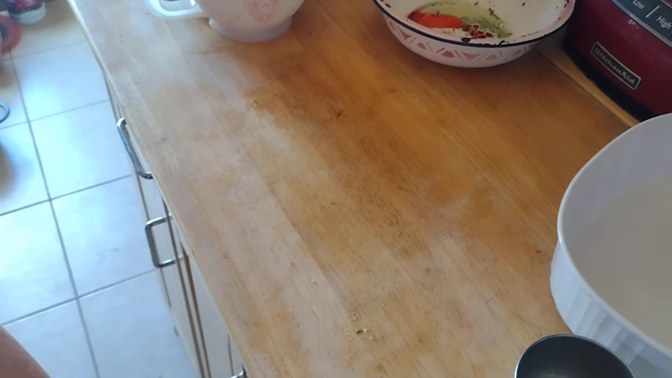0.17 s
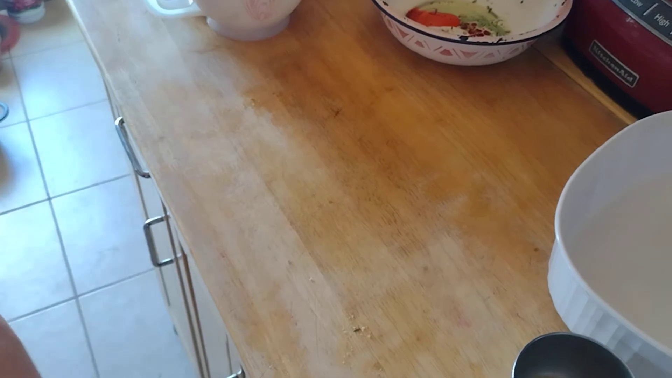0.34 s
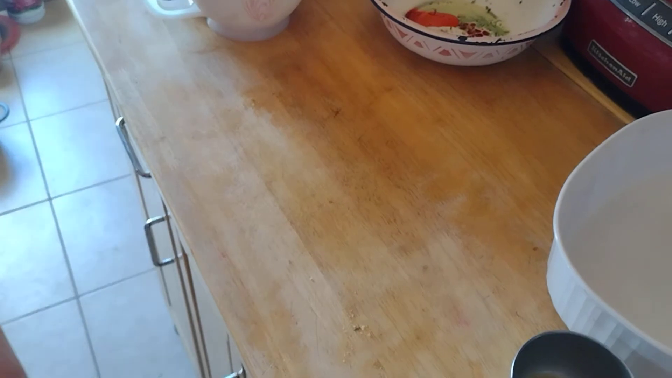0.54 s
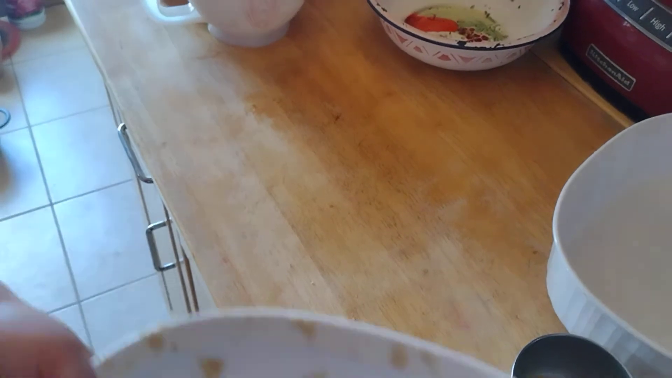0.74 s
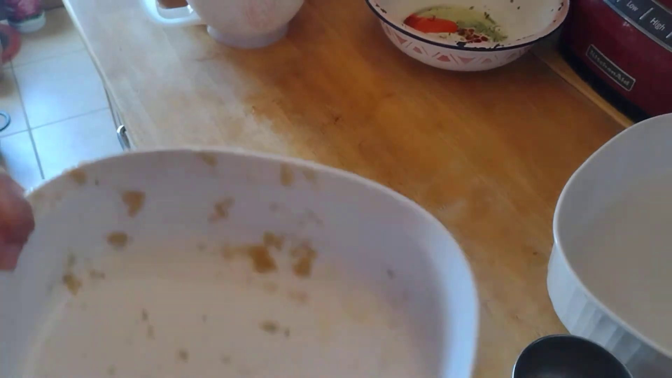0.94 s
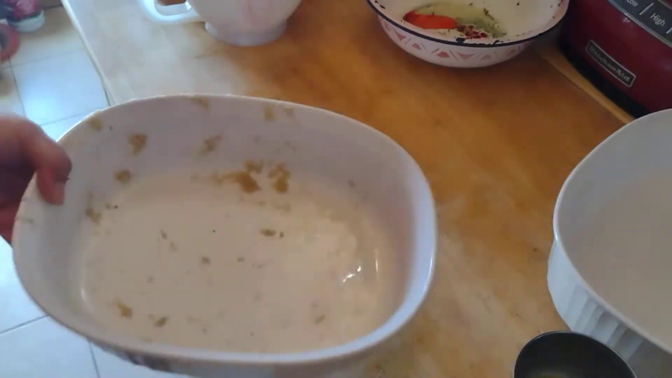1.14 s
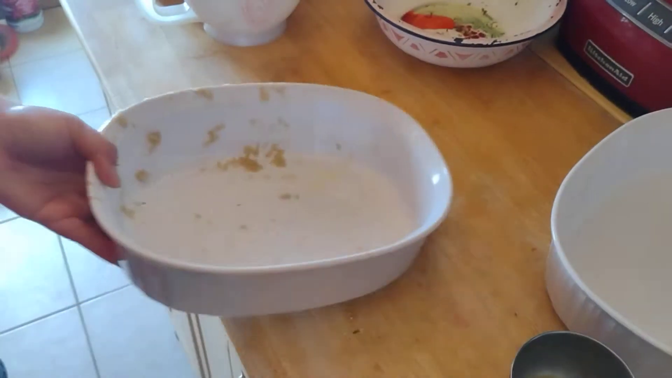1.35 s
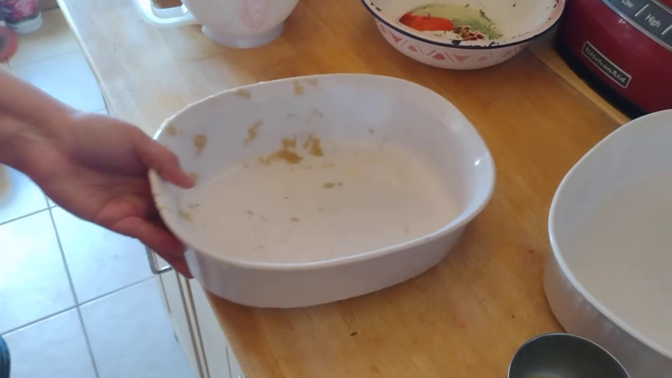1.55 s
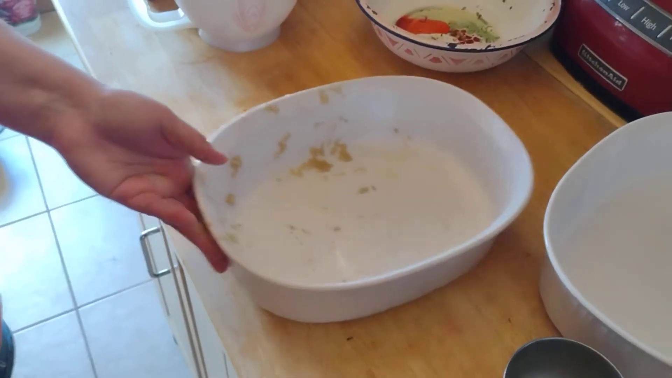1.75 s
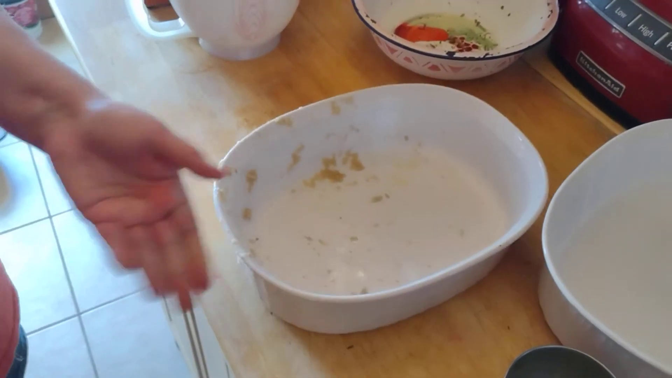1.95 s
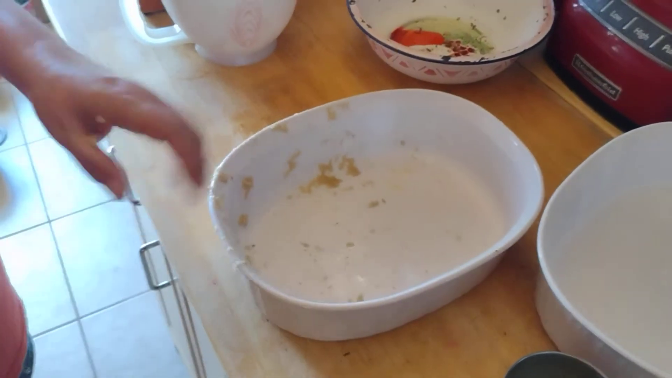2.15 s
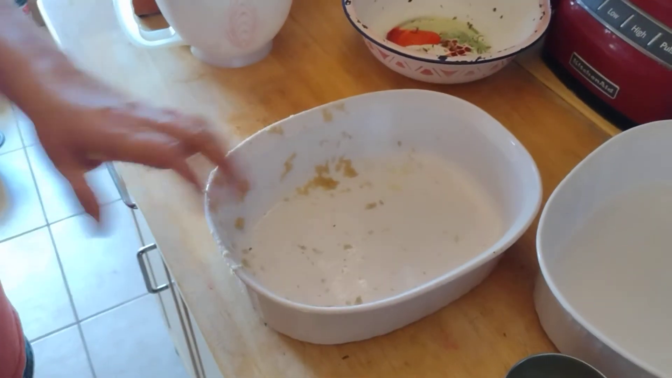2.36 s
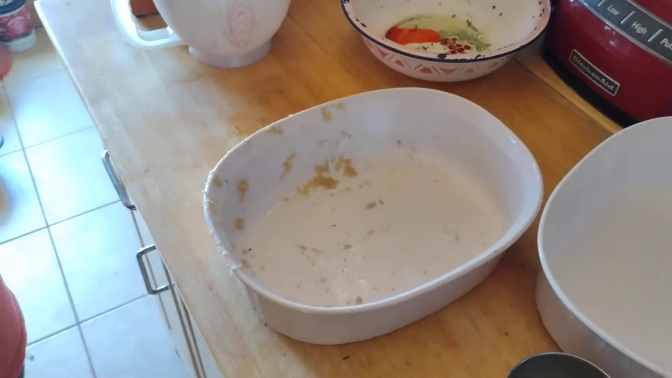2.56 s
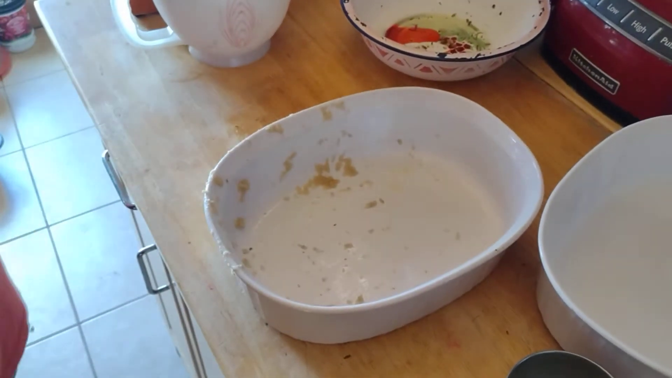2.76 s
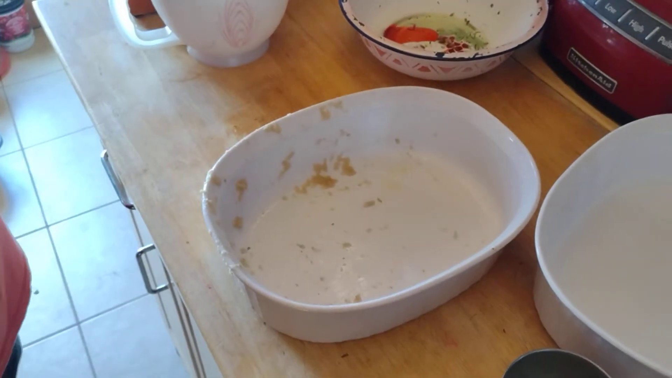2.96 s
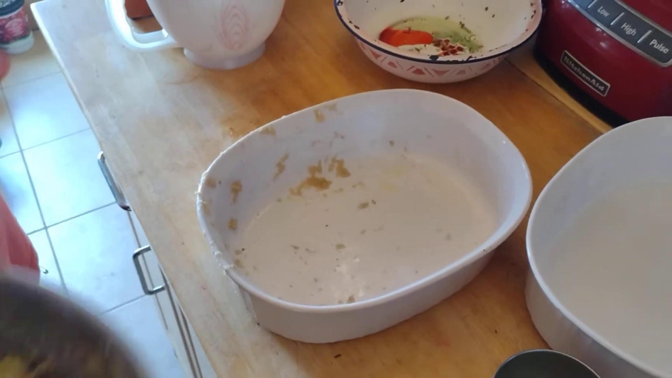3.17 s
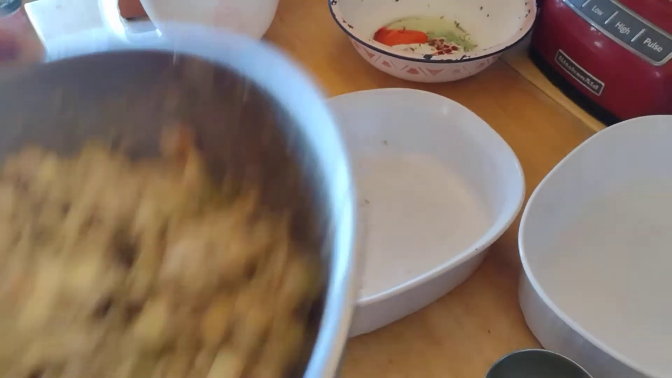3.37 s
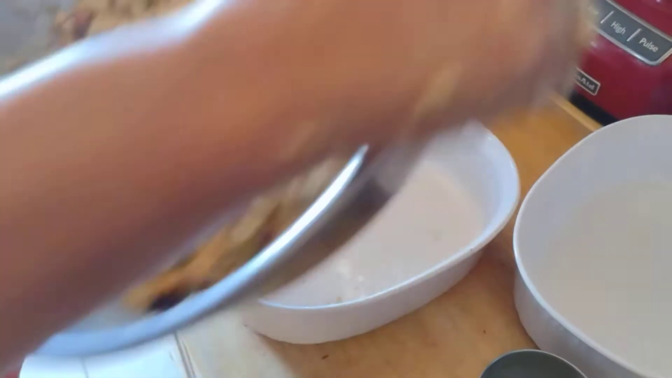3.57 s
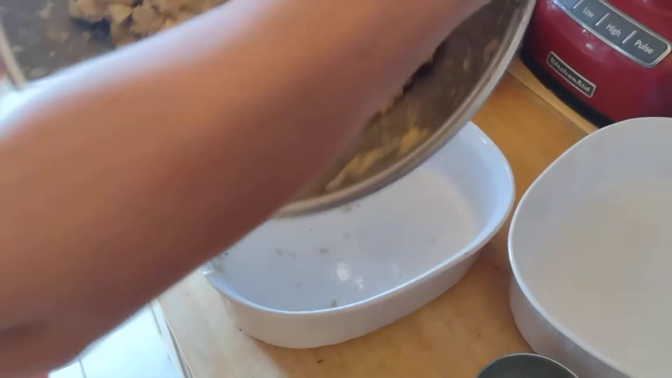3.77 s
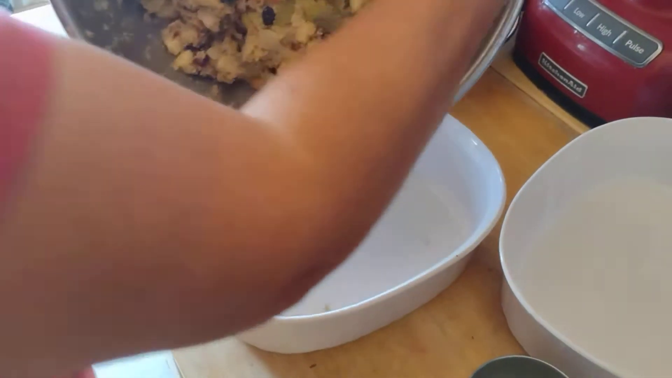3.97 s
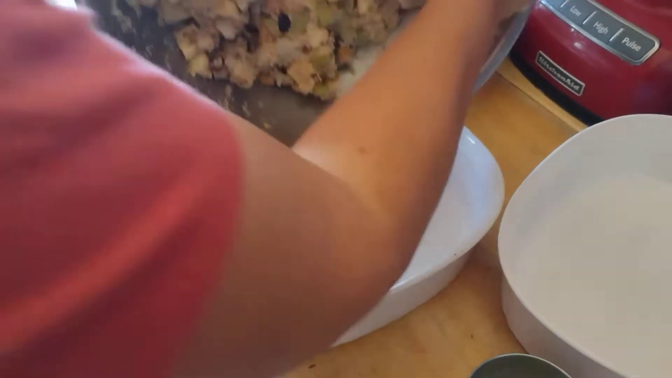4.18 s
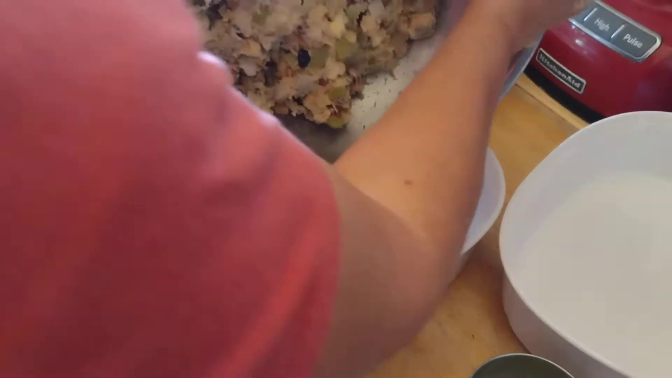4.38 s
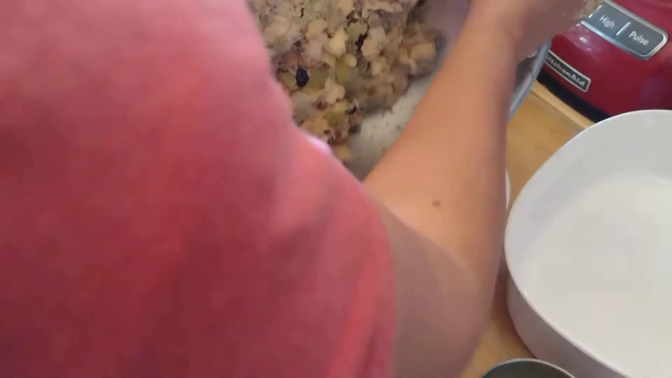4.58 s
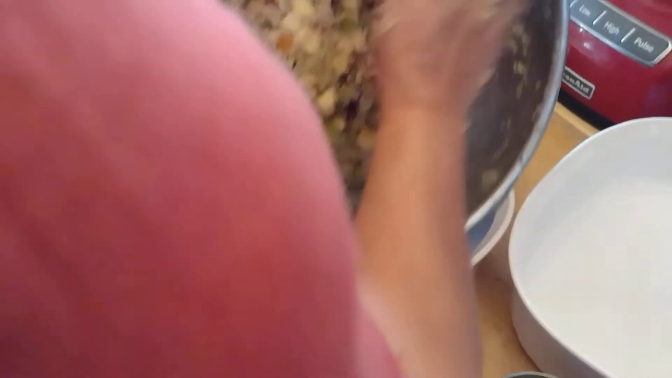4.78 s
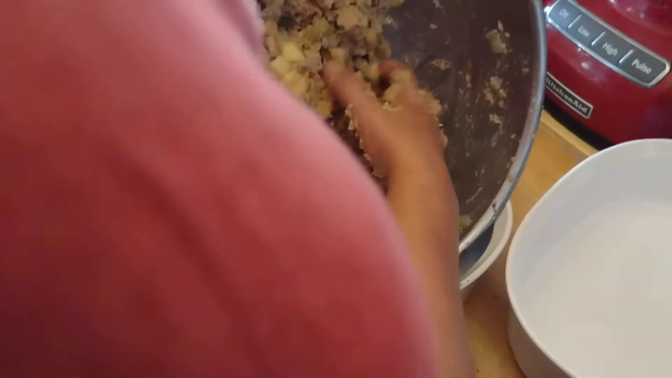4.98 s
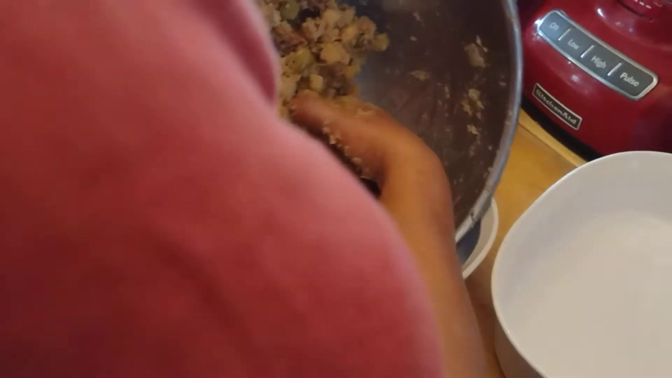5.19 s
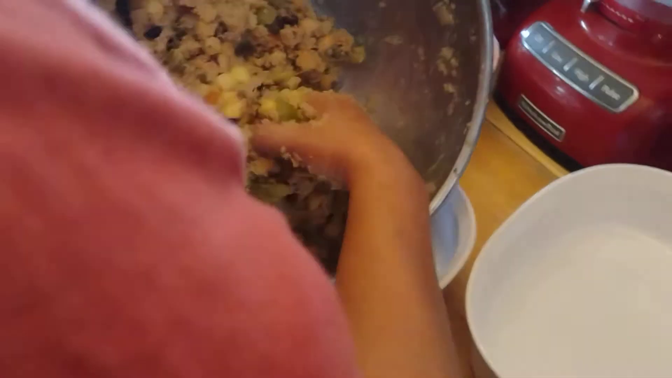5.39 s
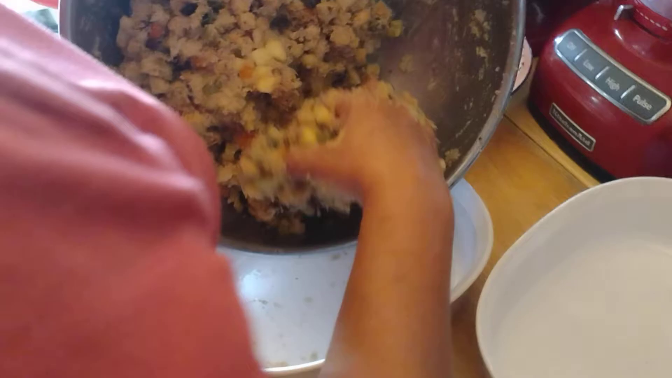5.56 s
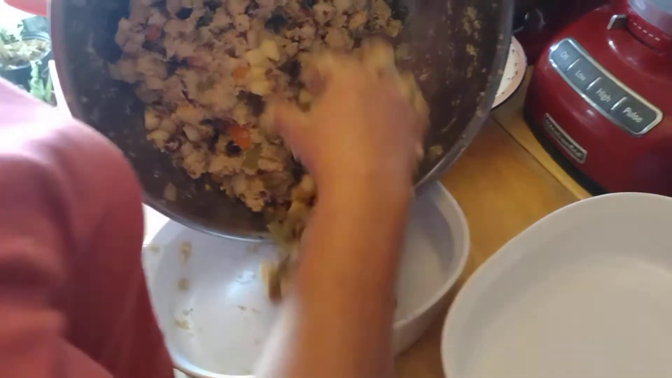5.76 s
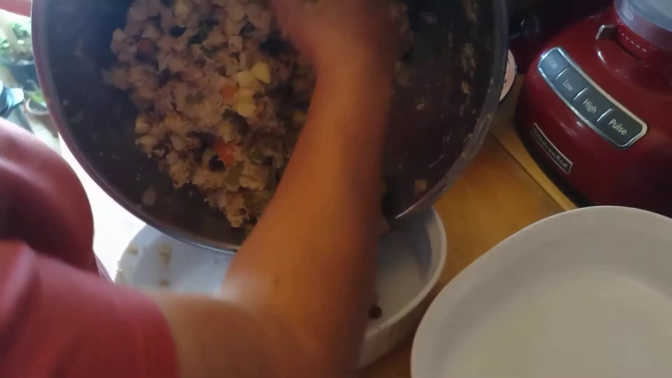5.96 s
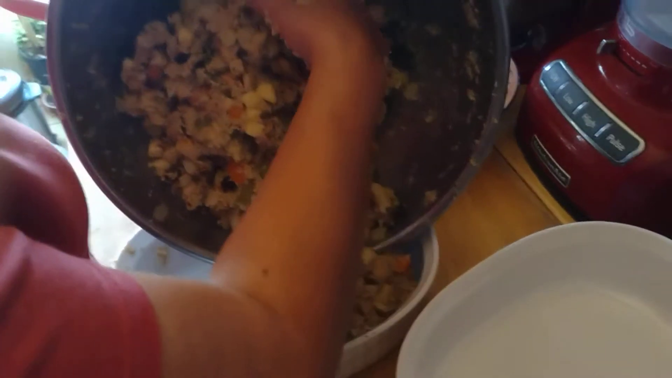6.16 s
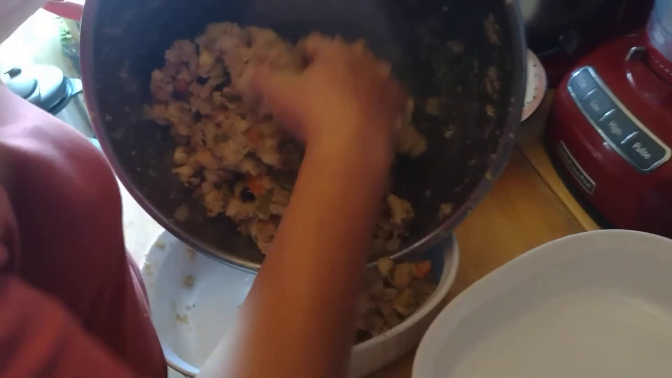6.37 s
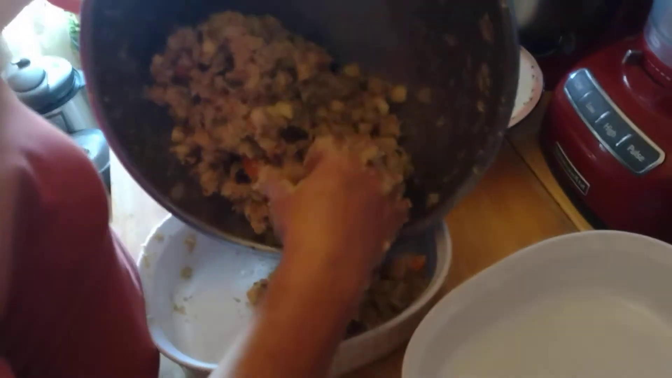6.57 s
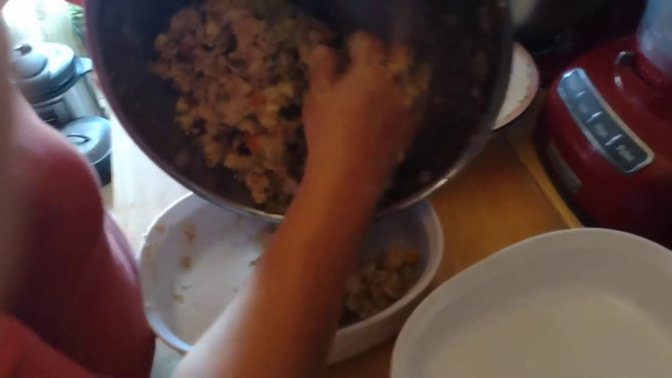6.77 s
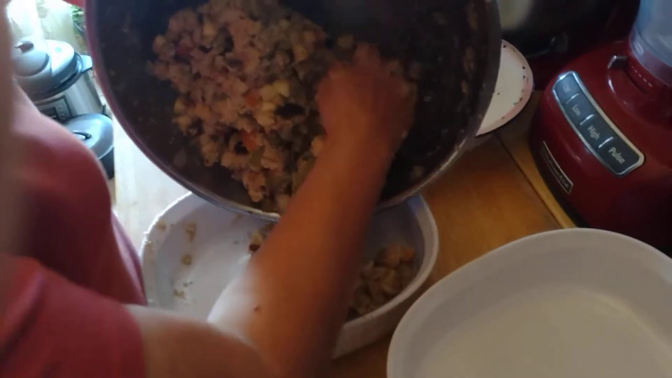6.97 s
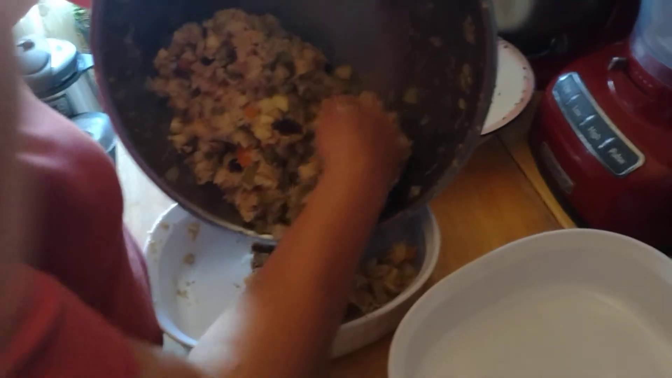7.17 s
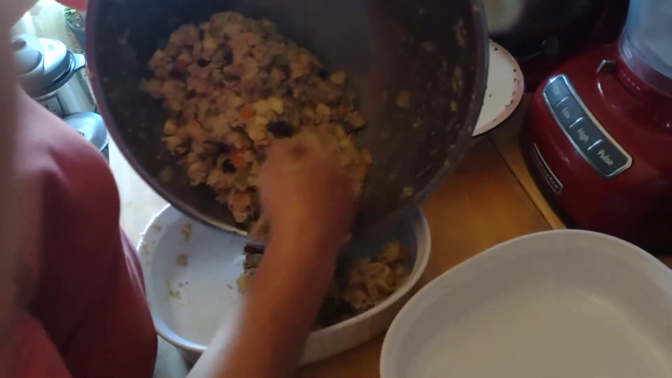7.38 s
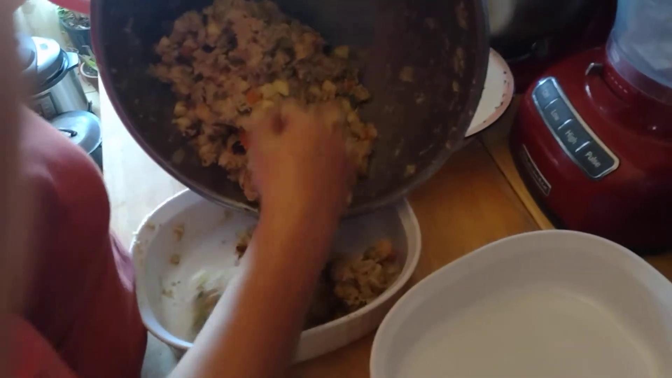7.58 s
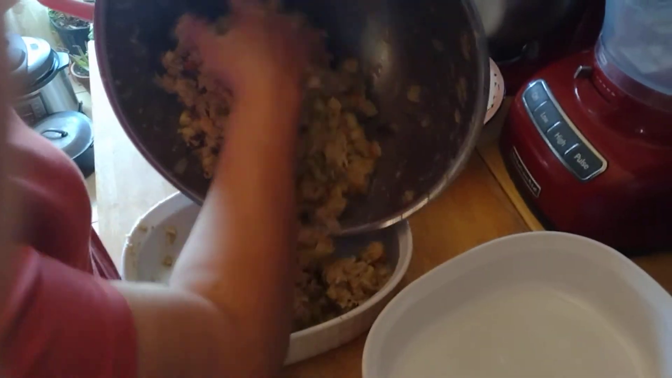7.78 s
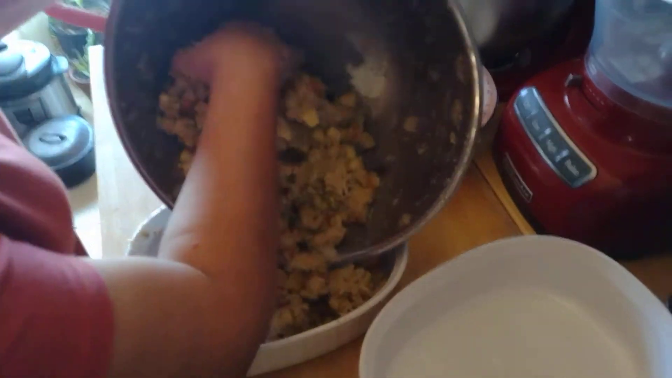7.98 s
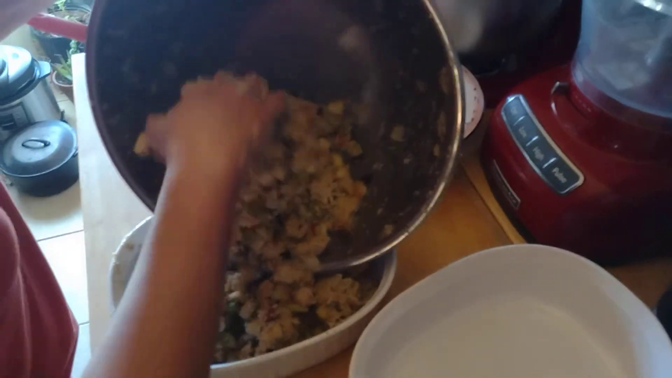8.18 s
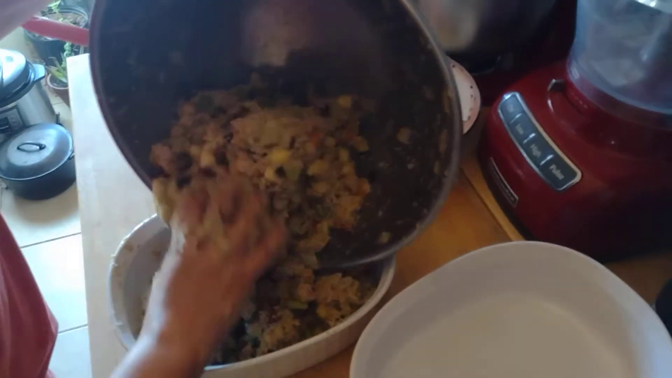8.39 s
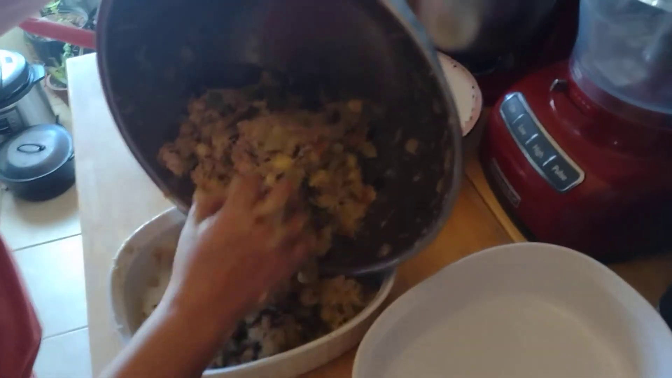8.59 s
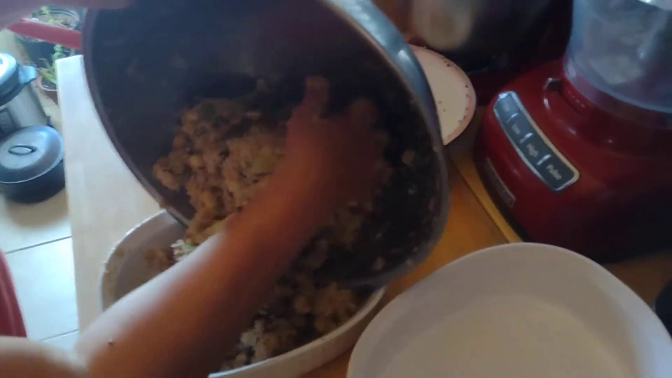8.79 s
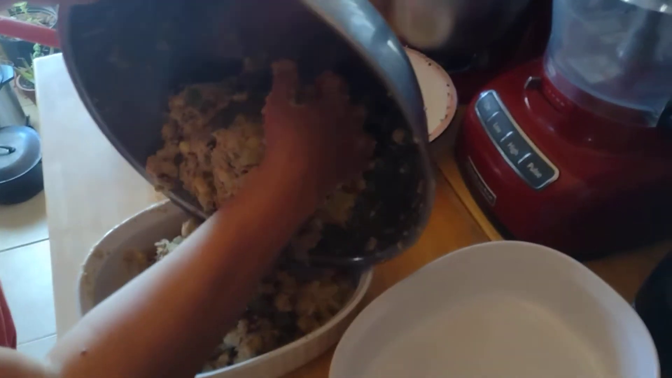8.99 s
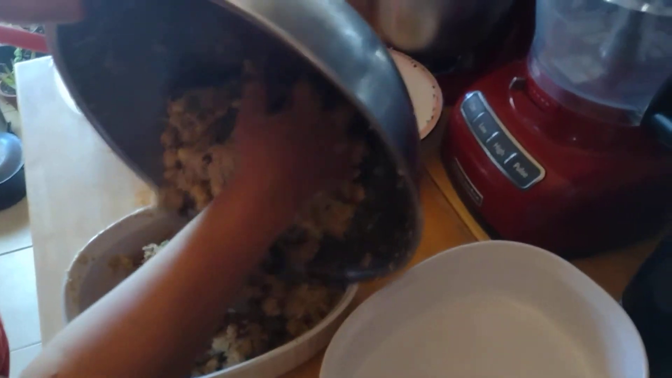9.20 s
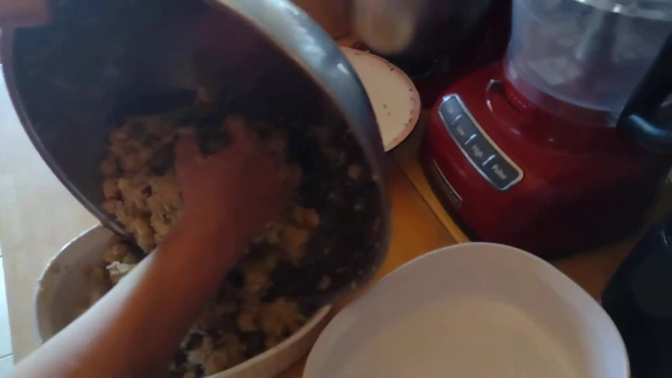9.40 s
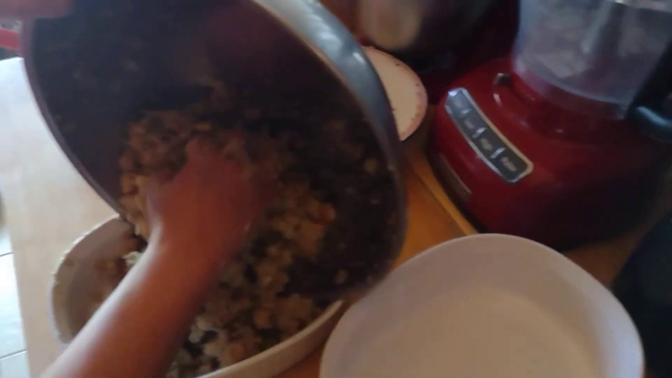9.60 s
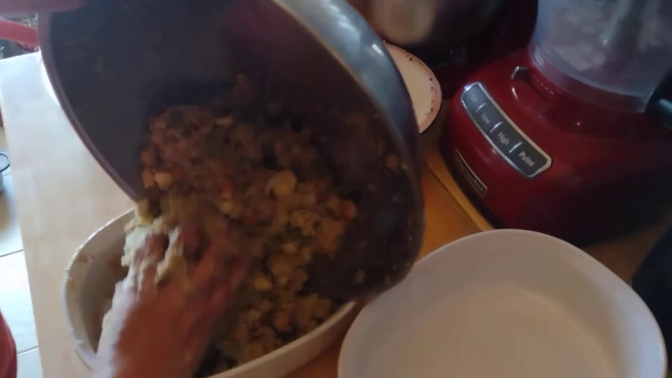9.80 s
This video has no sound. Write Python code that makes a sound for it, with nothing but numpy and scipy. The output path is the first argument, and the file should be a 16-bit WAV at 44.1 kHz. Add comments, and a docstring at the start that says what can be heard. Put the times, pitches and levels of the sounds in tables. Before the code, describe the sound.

In a quiet kitchen, a heavy dish thumps onto wood, then a metal bowl knocks and grates on its rim amid wet, sticky handfuls of food.

```python
"""A quiet kitchen: a ceramic dish slides and lands on a wooden counter, then a steel bowl tips onto its rim,
knocks, grates and sings against it while a hand scoops sticky food across.
Blows and rubbing drive tuned resonances; slides, food and blow tails are banded noise; sticky snaps are
short sine bursts with hiss. A steady hiss and narrow resonances of an appliance hum lie underneath."""
import sys
import numpy as np
from scipy import signal
from scipy.io import wavfile
from scipy.ndimage import uniform_filter1d

SR = 44100
rng = np.random.default_rng(int(sys.argv[2]) if len(sys.argv) > 2 else 0)


def log_audio(samples):
    """Write samples as a 16-bit WAV file to the path given in sys.argv[1]."""
    # one column per channel
    frames = np.atleast_2d(samples).T
    # limit to full scale, then quantise
    limited = np.clip(frames, -1, 1)
    pcm = np.round(limited * 32767).astype(np.int16)
    wavfile.write(sys.argv[1], SR, pcm)


def rack_gain(trim_db):
    """Turn a fader trim in dB into the linear factor to multiply a signal by."""
    fader = np.asarray(trim_db, float)
    return 10 ** (fader / 20)


N = 433944   # length in samples

# the dish lands and rocks on the wood: t/s, force/dB near 600 Hz, near 170 Hz, near 2200 Hz, favoured f/Hz
LANDING_BLOWS = [(1.374, -6.5, -25, -17, 853), (1.621, -22.5, -29, -38.5, 447),
                 (1.689, -26.5, -35, -55.5, 435), (1.773, -38, -39, -56.5, 435),
                 (1.834, -2.5, -18.5, -6.5, 1490)]
# dull blows of hand and food on the held bowl: t/s, force/dB near 600 Hz, near 170 Hz, near 2200 Hz
THUD_BLOWS = [(0.301, -66, -50, -82), (3.467, -74.5, -73, -42.5), (3.539, -51.5, -80, -62),
              (4.258, -64, -63, -53), (5.137, -41.5, -52.5, -36.5), (5.205, -66, -46, -36.5),
              (5.831, -18.5, -34, -32), (5.999, -42.5, -38.5, -41.5), (6.219, -43, -41, -47),
              (6.263, -50.5, -51, -32.5), (6.297, -50, -44, -35.5), (8.075, -45.5, -52, -38),
              (8.32, -38.5, -44.5, -43), (9.065, -24.5, -38, -19), (9.27, -32.5, -39, -22),
              (9.334, -39, -36, -25.5), (9.354, -25, -25, -38.5), (9.485, -27, -56, -30),
              (9.58, -36.5, -43, -40)]
# bowl on the rim of the dish: t/s, force/dB near 600 Hz, near 170 Hz, near 2200 Hz, favoured f/Hz
CLANG_BLOWS = [(4.467, -24.5, -32.5, -18, 3500), (4.534, -34, -48, -28.5, 3500),
               (4.613, -24, -29.5, -37.5, 622), (4.639, -33, -52, -55, 580),
               (4.856, -17.5, -32, -17.5, 935), (5.009, -12.5, -25.5, -22.5, 960),
               (5.722, -50, -51, -49.5, 1040), (5.745, -48, -59, -41, 1800), (5.796, -20, -19, -24.5, 497),
               (5.858, -54, -40, -25, 3040), (5.899, -36, -39, -42, 393), (6.186, -35, -29, -40.5, 491),
               (6.92, -50, -74.5, -69, 434), (6.97, -54, -56, -63, 432), (7.448, -51, -50.5, -48.5, 830),
               (7.566, -43.5, -53, -49, 2190), (7.88, -39.5, -59, -49.5, 432),
               (7.919, -46, -46.5, -48, 430), (8.267, -25.5, -34, -42.5, 783), (8.454, -54, -48, -56, 433),
               (8.819, -37, -43.5, -45.5, 396), (8.879, -52.5, -53.5, -71, 433),
               (9.208, -24.5, -27.5, -20.5, 2666)]
# pitches at which the force of a blow is given: f/Hz, in the column order of BLOWS
FORCE_HZ = [600, 170, 2200, 5700]
# base of the dish and the counter top under it: f/Hz, level/dB, t60/s (before damping by hands and food)
COUNTER_MODES = [(107.05, 3, 0.75), (131, -3, 0.16), (191, 4, 0.25), (260.4, -1.5, 0.21),
                 (369.5, -3.5, 0.15), (436.2, 1.5, 0.11), (530.7, -7, 0.23), (686.6, -20, 0.067),
                 (835.5, -2.5, 0.096), (979, -3.5, 0.069), (1210, -17.5, 0.13), (1466, -11, 0.12),
                 (1441.5, -7.5, 0.056), (1537, -3, 0.17), (1675, -13, 0.12), (1879, -3.5, 0.039),
                 (2325, -15, 0.26), (2970, -14, 0.17)]
# dish and bowl walls: f/Hz, level/dB, t60/s (before damping by hands and food)
VESSEL_MODES = [(901.3, -1.5, 0.54), (1200, -14.5, .1), (1480, -8, .15), (1620, -7, 0.11), (1967, -6, .12),
                (2260, -8, .12), (2544, 2, 0.61), (2435, 0.5, 0.3), (2566, 6, 0.094), (2920, -13, 0.16),
                (3500, -0.5, 0.27), (3719, -7.5, 0.1), (4850, 0.5, 0.11), (4843, -8.5, 0.13),
                (5713, -15.5, 0.21), (6700, -5.5, 0.072)]
# brighter clink set off by one blow: f/Hz, level/dB, t60/s
CLINK_MODES = [(3040, -12, .09), (3940, -6.5, 0.07), (4370, -3.5, 0.09), (4900, -3.5, 0.086),
               (6330, -4.5, 0.097), (6750, -1.5, 0.08), (7600, -6.5, 0.07)]
CLINK_S = 5.859
# short slides over the wood, fading as they slow: start t/s, length/s, level/dB, fade over the slide/dB
SLIDE_SPANS = [(0.271, 0.067, -57, 8), (0.358, 0.14, -48, 2.5), (1.494, 0.38, -42.5, 9.5),
               (1.803, .026, -34, 3), (4.969, 0.033, -28.5, 25)]
# the bowl leans on the dish and the dish creeps on the counter: t/s, level/dB
CREEP_CURVES = [
    [(4.34, -77), (4.52, -59), (4.66, -43.5), (4.86, -38.5), (4.94, -55.5), (5.49, -53.5), (5.77, -75),
     (5.9, -46), (6.14, -57), (6.28, -65), (6.41, -57.5), (7.24, -69), (7.63, -61.5), (8.16, -60.5),
     (8.31, -72.5), (8.57, -71), (8.73, -61.5), (8.91, -68), (9.25, -47), (9.44, -45.5), (9.84, -64.5)],
]
# steel grating over glaze: t/s, level/dB
GRATE_CURVES = [
    [(9.225, -43.5), (9.359, -41), (9.365, -56)],
]
# the rim sings while it rubs: start t/s, loudest t/s, lowest mode/dB, second mode/dB, third mode/dB
SINGING_BOUTS = [(4.608, 4.61, -52, -41.5, -51), (4.687, 4.772, -44, -35.5, -47),
                 (4.797, 4.801, -41, -40, -71.5), (4.894, 4.97, -41.5, -49, -43),
                 (5.037, 5.045, -67, -41, -59), (6.116, 6.214, -74.5, -53, -56.5),
                 (6.525, 6.576, -79, -64, -64), (6.599, 6.789, -72.5, -71, -66),
                 (7.09, 7.158, -74, -63.5, -62.5), (7.438, 7.444, -61.5, -68, -59.5),
                 (7.524, 7.572, -59, -62, -56.5), (7.85, 7.878, -69.5, -59, -65),
                 (7.885, 8.026, -67, -67.5, -71)]
# the grip on the bowl shifts its two lowest modes: from t/s, lowest mode f/Hz, second mode f/Hz
GRIPS = [(0, 851, 1550), (4.87, 921, 1480), (5.023, 894, 1540), (5.499, 867, 1480)]
# effort of the hands on bowl and food: t/s, level/dB
SCOOP_CURVES = [
    [(2.6, -83), (2.89, -61.5), (3.47, -79), (3.58, -62.5), (4.05, -80.5), (4.68, -58), (4.94, -61.5),
     (5.0, -67), (5.13, -58.5), (5.49, -53), (5.77, -63.5), (6.01, -52), (6.41, -52), (6.71, -59.5),
     (7.51, -65), (8.31, -54), (8.73, -65), (9.11, -61), (9.44, -56.5), (9.72, -54.5), (9.84, -57.5)],
]
# clearest snaps of sticky food letting go of steel: t/s, level/dB, f/Hz
CLEAR_TICKS = [(5.3464, -42, 4480), (6.001, -32, 5070), (6.0228, -35.5, 6600), (6.1005, -39.5, 6840),
               (6.1575, -42, 7200), (6.2834, -31, 6420), (6.1747, -32.5, 7400), (6.219, -25, 7140),
               (6.272, -23, 7000), (6.311, -36, 7400), (6.3365, -33.5, 6800), (6.403, -33, 7880),
               (6.4358, -34.5, 7290), (7.859, -42, 6700), (8.0782, -38, 6750), (8.2037, -40.5, 6140),
               (8.3032, -37.5, 6750), (8.4776, -39, 7190), (9.7494, -42, 5350)]
# faint rustle as the bowl is carried and shifted: t/s, level/dB
RUSTLE_CURVES = [
    [(3.49, -86), (3.54, -58), (3.66, -81)],
    [(4.972, -43.5), (5.02, -51.5)],
]
# colour of the rustle: f/Hz, width/Hz (sets the ring time), level/dB
RUSTLE_MODES = [(1960, 230, -7), (5208, 980, 1)]
# colour of the drag noise: f/Hz, relative level/dB per Hz
DRAG_COLOUR = [(35, -34), (60, -1), (429, 1), (469, -8.5), (690, -6.5), (914, -8), (2120, -22), (2360, -13),
               (4000, -43.5), (5200, -68), (8800, -120)]
# colour of the hand in the food: f/Hz, relative level/dB per Hz
HAND_COLOUR = [(1200, -12), (2500, 2), (4500, -5), (6500, -0.5), (8500, 0)]
# how the room dies away: f/Hz, t60/s
ROOM_DECAY = [(80, 0.53), (300, 0.34), (1500, 0.36), (2900, 0.4), (4200, 0.16), (7000, 0.34)]
# colour of the room hiss: f/Hz, relative level/dB per Hz
AIR_COLOUR = [(18, -57), (30, -35.5), (70, -6), (124, -5.5), (142, -18), (160, -11), (208, -5.5),
              (276, -18), (452, -16.5), (985, -21), (1280, -21), (2720, -19.5), (5920, -20), (7490, -21),
              (8430, -53.5), (11000, -80), (18500, -120)]
# appliance hum: f/Hz, width/Hz (sets the ring time), level/dB rms
HUM_MODES = [(120, 16, -78.5), (171, 9.8, -75.5), (206.3, 1.7, -76.5), (355.6, 9.2, -84.5)]

# by kind of blow (landings, thuds, clangs): loss of force from 2200 to 5700 Hz, and chatter of the surfaces
EDGE_LOSS_DB, CHATTER_MS = (27.5, 8.5, 6.5), (10.0, 5.4, 9.5)
KINDS = [len(LANDING_BLOWS), len(THUD_BLOWS), len(CLANG_BLOWS)]
# gentler contacts are softer: extra 5700 Hz loss, in dB per dB of force under a hard blow, for each kind
SOFTER_DB_PER_DB, HARD_BLOW_DB = (0, 0, 0.45), -20
# all blows: t/s, then force/dB at each of FORCE_HZ
BLOWS = [(*blow[:4], blow[3] - loss - softer * (HARD_BLOW_DB - blow[3]))
         for blow, loss, softer in zip(LANDING_BLOWS + THUD_BLOWS + CLANG_BLOWS,
                                       np.repeat(EDGE_LOSS_DB, KINDS), np.repeat(SOFTER_DB_PER_DB, KINDS))]


def rms_one(x):
    """Scale to unit rms."""
    return x / np.sqrt(np.mean(x ** 2) + 1e-20)


def level_curve(tables):
    """Level in dB at every sample, falling to silence within 15 ms outside each span."""
    rows = []
    for table in tables:
        rows += [(table[0][0] - .015, -99), *table, (table[-1][0] + .015, -99)]
    times, levels = np.transpose(rows)
    return np.interp(np.arange(N) / SR, times, levels)


def at_hz(points, hz):
    """Read a spectrum on a log-frequency axis."""
    freqs, values = np.transpose(points)
    return np.interp(np.log(hz), np.log(freqs), values)


def drift(count, spread_db=None):
    """Slow chance of unit spread, about count turns a second; or a gain that wanders by spread_db."""
    r = np.exp(-80 * np.pi * count / SR)   # computed once every 40 samples
    noise = rng.standard_normal(N // 40 + 2002)
    slow = rms_one(signal.lfilter([1], [1, -2 * r, r * r], noise)[2000:])
    if spread_db is not None:
        slow = rack_gain(spread_db * slow)
    return np.interp(np.arange(N) / 40, np.arange(len(slow)), slow)


def ring(force, hz, t60):
    """A two-pole resonance: a unit click sets a sine of height 1 ringing."""
    r, w = rack_gain(-60 / (t60 * SR)), 2 * np.pi * hz / SR
    return signal.lfilter([0, np.sin(w)], [1, -2 * r * np.cos(w), r * r], force + 1e-18)


def grains(per_s, spread_db):
    """Random clicks of uneven size, rms 1."""
    sizes = rack_gain(spread_db * np.minimum(rng.exponential(1, N), 4.0)) * rng.choice([-1, 1], N)
    return rms_one(sizes * (rng.random(N) < per_s / SR))


def force_at(hz):
    """Strength of every blow at one frequency: hard contacts reach the treble, heavy ones the bass."""
    order = np.argsort(FORCE_HZ)
    log_hz = np.log(FORCE_HZ)[order]
    force_db = np.array([np.interp(np.log(hz), log_hz, np.array(blow[1:5])[order]) for blow in BLOWS])
    force_db -= 14.0 * max(np.log2(110 / hz), 0)   # small bodies radiate no deep bass
    force_db -= 22.0 * max(np.log2(hz / 6200), 0)   # no contact is short enough for the very top
    return rack_gain(force_db)


def favoured(hz, boost_db):
    """The spot where dish or bowl lands favours the modes near one pitch."""
    def near(blows):
        pitches = np.array(blows)[:, 4]
        return np.exp(-(np.log(hz / pitches) / 0.087) ** 2)
    return boost_db * np.r_[near(LANDING_BLOWS), np.zeros(len(THUD_BLOWS)), near(CLANG_BLOWS)]


def chatter_s():
    """How long the uneven surfaces keep touching in each blow: lighter blows chatter more briefly."""
    hardest_db = np.array(BLOWS)[:, 1:].max(axis=1)
    share = np.clip(np.exp(0.04 * (hardest_db - hardest_db.max())), .4, 1)
    return np.repeat(CHATTER_MS, KINDS) / 1000 * share


def contacts(chatter_db):
    """Each blow is a first touch and a chatter of the uneven surfaces that swells and dies."""
    t, length = np.arange(2600) / SR, chatter_s()[:, None]
    swell = np.sqrt(t / length) * np.exp(-t / length) / np.sqrt(length * SR / 4)
    chatter = rng.standard_normal((len(BLOWS), len(t))) * swell
    return rack_gain(chatter_db) * chatter + .55 * (t == 0)


def struck(modes, touches, strike_db, rubbing):
    """Blows and rubbing ring the modes of one body; every blow meets each mode a little differently."""
    out = np.zeros(N)
    # close pairs of modes and shifting hands make each ring waver
    wavers = [drift(25, spread_db=3) for _ in range(4)]
    for hz, level_db, t60 in modes:
        t60 = min(t60, .32)   # hands and food damp every ring
        force = rubbing / np.sqrt(t60 * SR / 28)   # even loudness whatever the ring time
        uneven_db = 2.2 * rng.standard_normal(len(BLOWS))
        strengths = force_at(hz) * rack_gain(strike_db + favoured(hz, boost_db=12.5) + uneven_db)
        for blow, strength, touch in zip(BLOWS, strengths, touches):
            i = round(blow[0] * SR)
            force[i:i + len(touch)] += strength * touch[:N - i]
        out += rack_gain(level_db) * wavers[rng.integers(len(wavers))] * ring(force, hz, t60)
    return out


def counter(drag_db):
    """Blows and the grains of dragging ring the dish base and the counter top."""
    rubbing = rack_gain(drag_db - 17.5) * grains(1500, 2.2)
    return struck(COUNTER_MODES, contacts(chatter_db=-4.0), strike_db=-8.5, rubbing=rubbing)


def vessels(on_glaze, grating):
    """Clangs and grating ring the dish and bowl walls; the other blows hardly reach them."""
    damped_db = np.r_[np.full(len(BLOWS) - len(CLANG_BLOWS), -40), np.zeros(len(CLANG_BLOWS))]
    # broad rubbing reaches only the lower modes
    dull_grating = signal.sosfilt(signal.butter(6, 2750, fs=SR, output="sos"), grating)
    return struck(VESSEL_MODES, on_glaze, strike_db=damped_db - 16.5, rubbing=rack_gain(-8.5) * dull_grating)


def clink(on_glaze):
    """One blow rings a set of brighter modes; all others are held 80 dB down."""
    others_db = np.array([-80 * (abs(blow[0] - CLINK_S) > .005) for blow in BLOWS])
    return struck(CLINK_MODES, on_glaze, strike_db=others_db - 1.0, rubbing=np.zeros(N))


def drag_level():
    """Level of slides and creep together: slides have quick edges and a steady fade between them."""
    t = np.arange(N) / SR
    levels = [level_curve(CREEP_CURVES)]
    for start, length, level_db, fade_db in SLIDE_SPANS:
        fade = fade_db * np.clip((t - start) / length, 0, 1)
        outside_s = np.maximum(np.maximum(start - t, t - start - length), 0)
        levels.append(level_db - fade - 2501.5 * outside_s)   # edges in dB per second
    return np.max(levels, axis=0)


def grate():
    """Steel catching on glaze: a dense, wavering stream of grains."""
    return rack_gain(level_curve(GRATE_CURVES) + 0.71 * drift(40)) * grains(2400, 3.7)


def rasp(grating):
    """The grating itself, heard through a broad band."""
    return rack_gain(5.0) * signal.sosfilt(signal.butter(2, [1500, 5500], "band", fs=SR, output="sos"), grating)


def singing():
    """Stick and slip feed three throbbing rim modes; a bout swells, dies, and a new grip stops it."""
    swell_db, release_db_per_s, third_mode_hz = 17, 151, 2406
    t, grips = np.arange(N) / SR, np.array(GRIPS)
    grip = np.searchsorted(grips[:, 0], t, side="right") - 1
    pitches = [grips[grip, 1], grips[grip, 2], np.full(N, third_mode_hz)]
    bouts = []
    for start, loudest, *_ in SINGING_BOUTS:
        swell = swell_db * (t - loudest) / (loudest - start)
        shape = rack_gain(np.where(t < loudest, swell, release_db_per_s * (loudest - t)))
        same_grip = grip == grip[round(loudest * SR)]
        bouts.append(shape * same_grip * (t > start))
    heights = rack_gain(np.array(SINGING_BOUTS)[:, 2:].T) @ np.array(bouts)
    out = np.zeros(N)
    for hz, height, throb in zip(pitches, heights, [40, 32, 28]):
        turn = np.exp(2j * np.pi * np.cumsum(hz) / SR)
        # a little steady tone inside a narrow band of noise
        tone = rms_one(np.real(turn * (0.27 + drift(throb) + 1j * drift(throb))))
        out += uniform_filter1d(height, size=300) * tone
    return out


def ticks(hand_db):
    """Sticky food lets go in wet snaps: a couple of cycles and a puff of hiss each."""
    out, t = np.zeros(N), np.arange(400) / SR
    # smaller snaps come at random, louder and denser the harder the hand works
    busy_db, snaps_per_s_when_busy = -54, 40
    slots = np.arange(0, N, 200)
    effort_db = hand_db[slots]
    chance, size, pitch = rng.random((3, len(slots)))
    small_db = effort_db + 3.5 - 3.0 * np.log(size + 1e-3)
    small_hz = np.interp(pitch, [0, 1], (3500, 7600))
    happens = chance < snaps_per_s_when_busy * rack_gain(effort_db - busy_db) * 200 / SR
    small = np.c_[slots / SR, small_db, small_hz][happens]
    puffs = rng.standard_normal((len(CLEAR_TICKS) + len(slots), len(t)))
    for (start, level_db, hz), noise in zip([*CLEAR_TICKS, *small], puffs):
        i = round(start * SR)
        snap = np.sin(2 * np.pi * hz * t) * np.exp(-t * hz / 2.5)
        hiss = np.diff(noise, prepend=0) * np.exp(-t / 0.00066)
        out[i:i + len(t)] += rack_gain(level_db - 0.5) * (snap + hiss)[:N - i]
    return out


def rustle():
    """Fine grains through two broad resonances."""
    level_db, fine = level_curve(RUSTLE_CURVES), grains(2100, 3.8)
    return sum(rack_gain(level_db + db) * rms_one(ring(fine, hz, 9.6 / width)) for hz, width, db in RUSTLE_MODES)


def band_gain(colour, hz):
    """Gain of a noise colour at one frequency, scaled so that its total power is one."""
    wide = np.geomspace(30, 9000, 200)
    power = np.sum(rack_gain(2 * at_hz(colour, wide)) * np.gradient(wide))
    return rack_gain(at_hz(colour, hz)) / np.sqrt(power / (SR / 2))


def blow_power(hz, crack_db, tail_db):
    """Noise power after the blows in one band: a brief crack and a longer room tail."""
    hits = np.zeros(N)
    hits[[round(blow[0] * SR) for blow in BLOWS]] = force_at(hz) ** 2 * SR / hz
    room = rack_gain(-120 / (at_hz(ROOM_DECAY, hz) * SR))
    crack = np.exp(-1 / ((0.003 + 0.87 / hz) * SR))
    rise = np.exp(-1 / ((0.00089 + 0.044 / hz) * SR))
    power = rack_gain(2 * tail_db) * signal.lfilter([1], [1, -room], hits + 1e-18)
    power += rack_gain(2 * crack_db) * signal.lfilter([1], [1, -crack], hits + 1e-18)
    return signal.lfilter([1 - rise], [1, -rise], power)   # the contact builds over a moment


def diffuse(drag_db, hand_db, crack_db, tail_db):
    """Third-octave noise bands add the powers of blow tails, drag, the hand in the food and room air."""
    out, edges = np.zeros(N), 35 * 2 ** np.arange(0, 8.1, 1 / 3)
    white, grit = rng.standard_normal((2, N)), grains(450, 5)
    drag, hand = rack_gain(drag_db), rack_gain(hand_db)
    for k, (low, high) in enumerate(zip(edges, edges[1:])):
        hz = np.sqrt(low * high)
        air = (rack_gain(-70) * band_gain(AIR_COLOUR, hz) * drift(3, spread_db=1.6)) ** 2
        tail = blow_power(hz, crack_db, tail_db)
        # tails drop away fast as they near the room noise
        power = air + tail ** 3 / (tail + rack_gain(2 * 21.0) * air) ** 2
        power += (band_gain(DRAG_COLOUR, hz) * drag * drift(25, spread_db=3.0)) ** 2
        squelch = band_gain(HAND_COLOUR, hz) * rack_gain(-60 * (hz < 1000)) * hand   # no low squelch
        power += (0.3 * squelch) ** 2
        sos = signal.butter(2, [low, high], "band", fs=SR, output="sos")
        out += signal.sosfilt(sos, np.sqrt(power) * white[k % 2] + 0.2 * squelch * grit)
    return out


def hum():
    """A motor in the room excites a few narrow, wavering resonances."""
    return sum(rack_gain(level_db) * rms_one(ring(rng.standard_normal(N), hz, 3.6 / width))
               for hz, width, level_db in HUM_MODES)


def scene():
    """Counter, vessels, food and room, heard from one point."""
    drag_db, hand_db = drag_level(), level_curve(SCOOP_CURVES)
    on_glaze, grating = contacts(chatter_db=-4.5), grate()
    bodies = counter(drag_db) + vessels(on_glaze, grating) + clink(on_glaze)
    rubbed = rasp(grating) + singing()
    noise = diffuse(drag_db - 5.0, hand_db, crack_db=-7.0, tail_db=-19.5)
    return (bodies + rubbed + ticks(hand_db) + rustle() + noise + hum())[None]


def top_cut(x):
    """Nothing passes above the cut-off."""
    return signal.sosfilt(signal.butter(12, 8580, fs=SR, output="sos"), x)


def record(dry):
    """A small microphone with no deep bass; peaks are rounded and the top is cut."""
    x = signal.sosfilt(signal.butter(4, 78, "high", fs=SR, output="sos"), dry)
    rounded = np.tanh(x / 0.93) * 1.133
    x = signal.sosfilt(signal.cheby2(14, 60, 8674, fs=SR, output="sos"), rounded)   # 60 dB down at 8674 Hz
    return top_cut(x)


dry = scene()
out = record(dry)
log_audio(out)
```